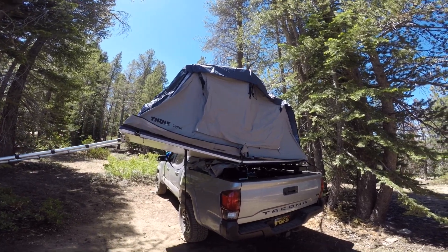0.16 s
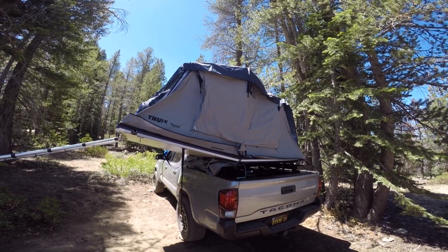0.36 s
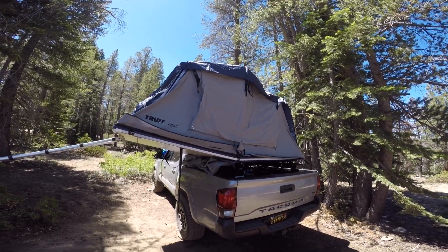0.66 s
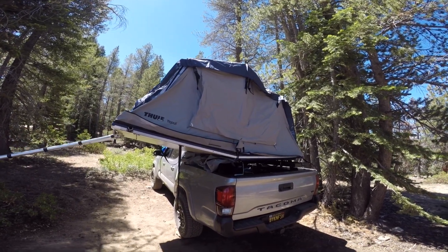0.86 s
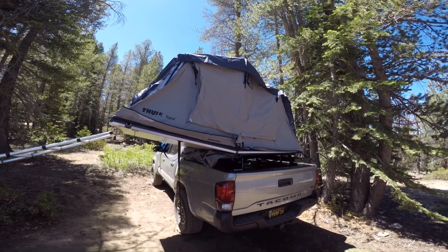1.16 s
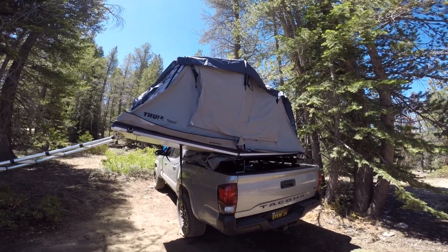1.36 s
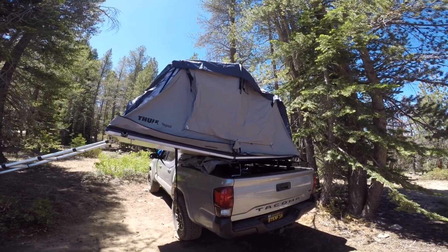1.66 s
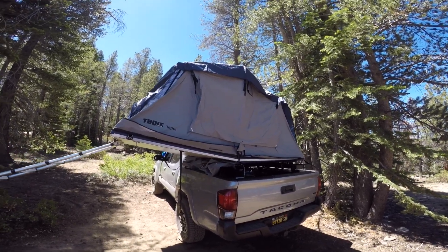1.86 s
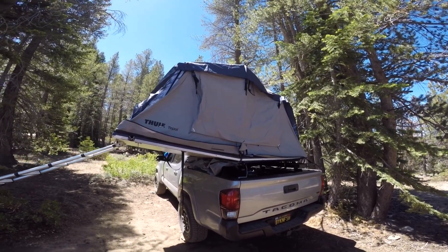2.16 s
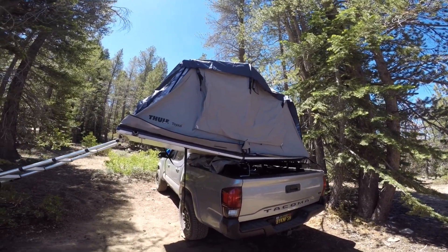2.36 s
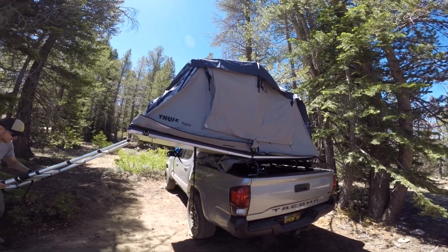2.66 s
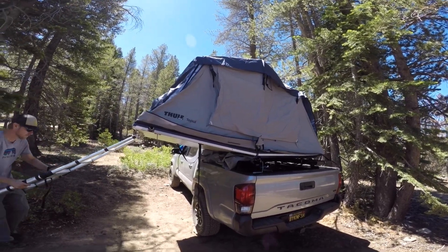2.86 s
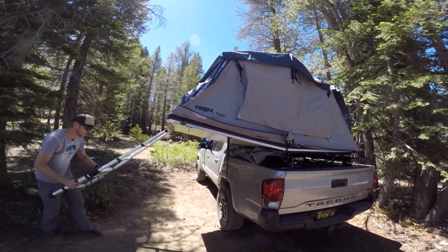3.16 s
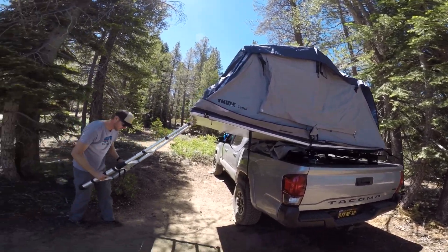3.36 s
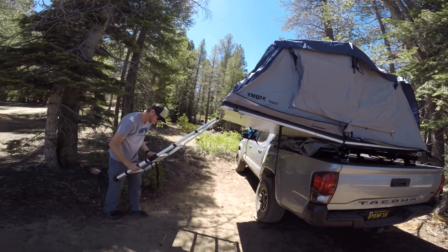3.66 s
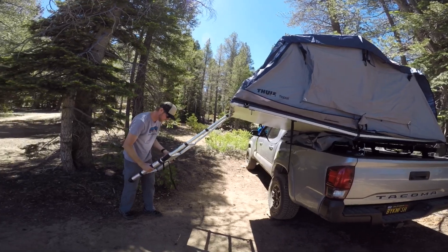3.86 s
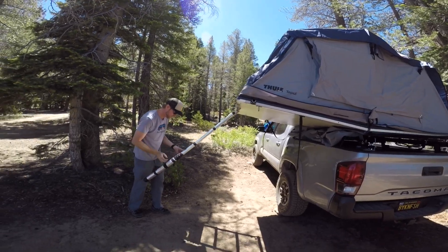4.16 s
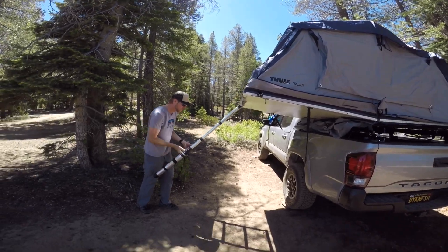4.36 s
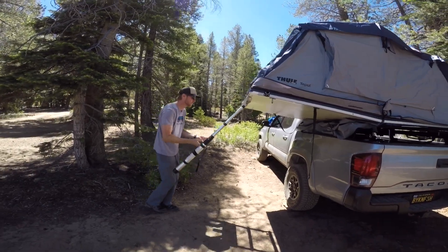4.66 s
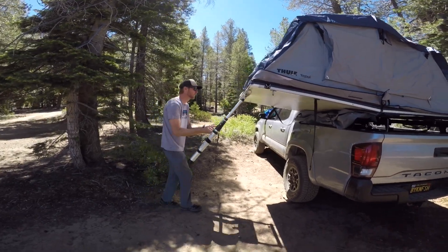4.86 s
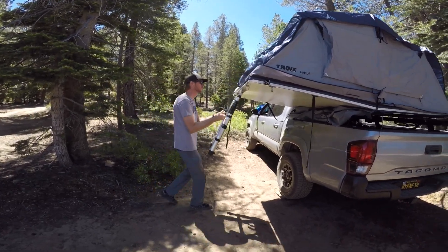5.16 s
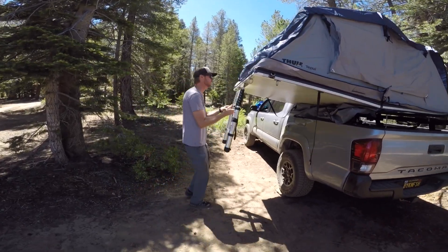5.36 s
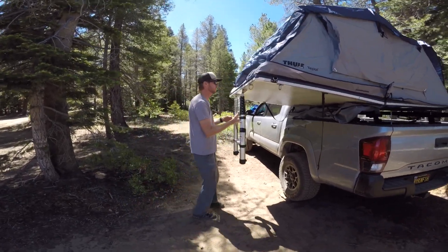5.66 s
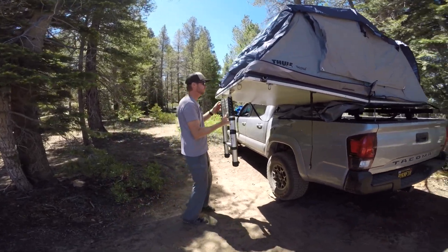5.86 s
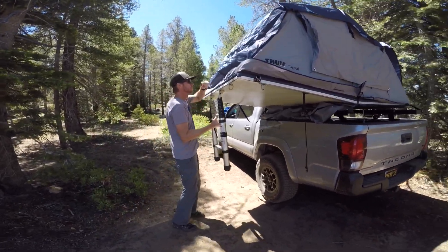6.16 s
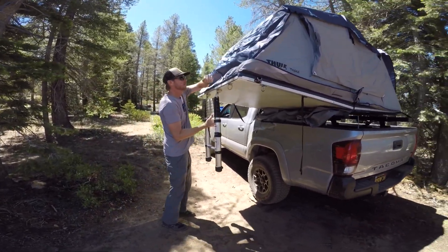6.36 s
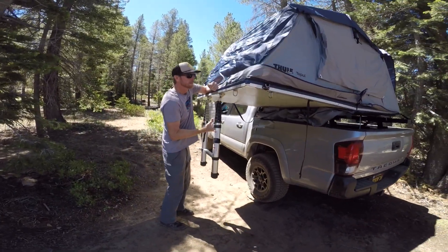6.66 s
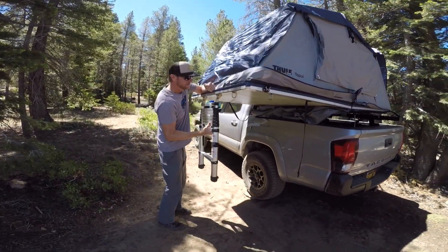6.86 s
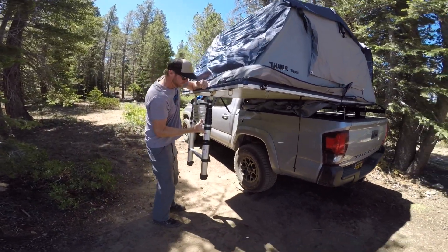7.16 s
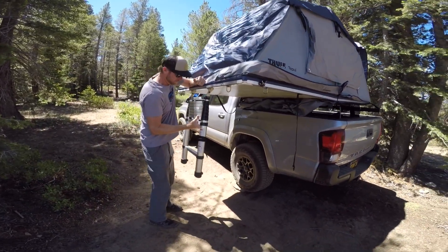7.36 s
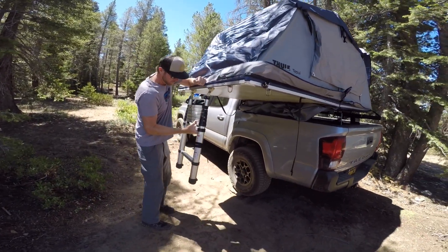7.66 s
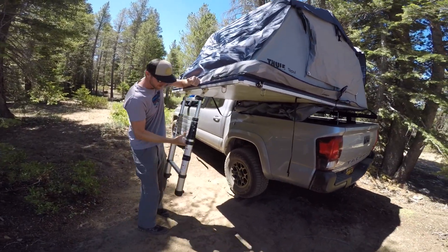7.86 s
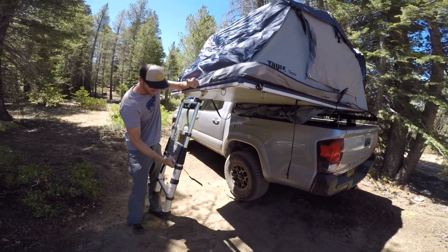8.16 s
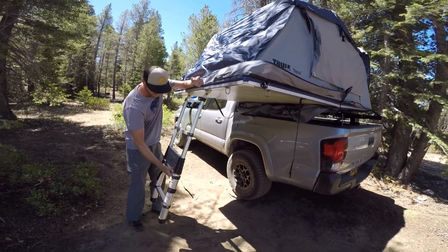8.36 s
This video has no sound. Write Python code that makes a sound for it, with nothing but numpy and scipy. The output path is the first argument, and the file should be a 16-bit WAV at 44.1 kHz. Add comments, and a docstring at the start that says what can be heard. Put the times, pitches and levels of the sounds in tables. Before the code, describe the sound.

Outdoors, close and dry with slight scatter from truck and ground: light latch clicks, then stronger aluminium knocks with short rings, and deep boxy handling bumps. Later come dry canvas scuffs, gritty ticks and a faint singing slide of tubes, then a final sharp clack. Low gusts buffet the microphone above a far, smooth hiss of trees.

```python
"""Beside an opened rooftop tent in a quiet forest, a telescopic aluminium ladder is pushed together and swung down.
Noise cracks with decaying modes make its latches and tubes clack; singing band noise makes the tubes slide.
Shaped noise makes grit tick and canvas rustle; swelling damped tones thump the frame and the camera housing.
Gusting low noise flutters on the microphone ports, over the steady far hiss of the pines."""
import sys
import numpy as np
from scipy import signal
from scipy.fft import rfft, irfft
from scipy.io import wavfile
from scipy.ndimage import uniform_filter1d, map_coordinates

SR = 44100
rng = np.random.default_rng(int(sys.argv[2]) if len(sys.argv) > 2 else 0)


def store_wav(level_fs):
    """Save 16-bit WAV to argv[1]."""
    pcm = np.round(np.clip(np.atleast_2d(level_fs), -1, 1) * 32767)
    wavfile.write(sys.argv[1], SR, pcm.T.astype(np.int16))


N = 375732
TIME = np.arange(N) / SR
RING = TIME[:int(SR * .25)]  # time within one contact, s
OPPOSITE = np.array([[1], [-1]])  # signs of a side signal in left and right

# width of spread sounds at the two ports, side minus mid: hz, gain_db
DIFFUSE_WIDTH = [(60, -6), (200, -2.5), (380, -1), (700, 8), (1300, 5), (2400, -1), (4400, -6), (8000, 0.5),
                 (15000, 0.5)]
# spectrum of bright sliding friction: hz, gain_db
SLIDE_COLOUR = [(900, -6), (2200, 7), (3300, 7), (4800, 2), (6400, 5), (8000, 0), (15000, -54)]
# single strokes of cloth and strap: start_s, length_s, soft_brushing_db, bright_sliding_db
STROKES = [(0.829, 0.16, -52.5, -56.5), (3.224, 0.13, -64, -53.5), (3.916, 0.23, -76, -57.5),
           (4.202, 0.15, -53.5, -72), (4.904, 0.32, -60.5, -61), (5.459, 0.23, -48, -59.5),
           (6.44, 0.19, -50.5, -59), (6.596, 0.21, -45.5, -64), (7.035, 0.08, -48, -46.5),
           (7.146, 0.064, -52, -45), (7.499, 0.088, -43.5, -58), (7.683, 0.48, -52.5, -65),
           (8.123, 0.15, -49, -52.5)]
# restlessness of the grip on the camera: time_s, level_db of the housing's murmur before its trim
GRIP = [(0.0, -49.5), (0.88, -45.5), (1.44, -56), (1.73, -36.5), (2.52, -47.5), (2.8, -36.5), (3.06, -47.5),
        (4.03, -44), (4.86, -52), (5.2, -36), (6.29, -63.5), (6.45, -36.5), (6.67, -31.5), (6.87, -48.5),
        (7.31, -44), (7.66, -47), (8.52, -66)]


def undb(db):
    """Decibels to amplitude ratio."""
    return 10 ** (np.asarray(db) / 20)


def unit(x):
    """Normalisation to rms 1."""
    return x / np.sqrt(np.mean(x ** 2))


def curve(rows):
    """Linear interpolation of (time, value) rows over the scene."""
    times, values = np.transpose(rows)
    return np.interp(TIME, times, values)


def colour(x, points):
    """Minimum-phase filter through (Hz, dB) points, from the folded cepstrum of the log gain."""
    size = 8192
    hz, db = np.transpose(points)
    bin_hz = np.arange(size // 2 + 1) * SR / size
    gain_db = np.interp(np.log(bin_hz + 1), np.log(hz), db)
    cepstrum = irfft(np.log(undb(gain_db)))
    cepstrum[1:size // 2] *= 2
    cepstrum[size // 2 + 1:] = 0
    impulse = irfft(np.exp(rfft(cepstrum)))
    return signal.fftconvolve(x, impulse)[:len(x)]


def band(x, lo_hz, hi_hz):
    """Butterworth band-pass."""
    return signal.sosfilt(signal.butter(2, [lo_hz, hi_hz], "band", fs=SR, output="sos"), x)


def stereo(mid, side, width):
    """Mid-side decoding: left and right are the sum and difference of mid and coloured side."""
    side = colour(side, width)
    return np.array([mid + side, mid - side])


def panned(x, rows):
    """Intensity panning along a curve of left minus right dB."""
    return x * undb(OPPOSITE * curve(rows) / 2)


def walk(rate_hz):
    """Slow random modulation of rms 1: random steps smoothed by two moving averages."""
    hold = int(SR / rate_hz)
    steps = rng.standard_normal(4096)[np.arange(N) // hold]
    return unit(uniform_filter1d(uniform_filter1d(steps, hold), hold))


def add(track, s, sound):
    """Linear superposition of a sound at time s."""
    i = max(int(s * SR), 0)
    track[..., i:i + sound.shape[-1]] += sound[..., :N - i]


def fade(t60):
    """Exponential decay of a damped body, 60 dB in t60 seconds."""
    return np.exp(-np.log(1000) * RING / t60)


def grains(points, spread_db):
    """Stick-slip friction as coloured noise of rms 1, its tiny slips very unequal in size."""
    slip = 32  # samples
    size = undb(spread_db * np.minimum(rng.exponential(size=N // slip + 1), 6))
    return unit(colour(rng.standard_normal(N) * size[np.arange(N) // slip], points))


def strike(mid, side, db, body_db, edge_db):
    """Contact mechanics: hardness tilts the spectrum, force sets the mid band's rms over the first 5 ms."""
    # width of a contact, side minus mid: hz, gain_db
    direct_width = [(200, -26), (700, -1), (1200, -2.5), (2200, -4), (4000, -18), (7000, 0), (12000, 2)]
    tilt = [(900, body_db), (2000, 0.0059), (4200, 0.0045),
            (6500, edge_db), (9000, edge_db), (15000, edge_db - 30)]
    mid, side = colour(mid, tilt), colour(side, tilt)
    first = band(mid, 1800, 5000)[:SR // 200]
    return undb(db) * stereo(mid, side, direct_width) / np.sqrt(np.mean(first ** 2))


def ladder():
    """Impact excitation of modes: each contact touches, bites and bounces; its latch pings, its tube rings on."""
    # modes of the ladder tubes: pitch_hz, level_db, t60_s
    tube_modes = [(1866, -25, .07), (2223, -0.5, .11), (2407, 0.5, 0.063), (2655, -7, 0.057),
                  (3010, -3, 0.046), (3230, 7, 0.039), (3510, 3, 0.041), (4350, 4, 0.043),
                  (4580, -4.5, 0.11), (5130, -15, 0.093), (5880, -2.5, 0.043), (6235, -1.5, 0.048),
                  (7000, -4, 0.083)]
    # spectrum of latch cracking on tube: hz, gain_db
    crack_colour = [(250, -6.5), (500, 3), (900, 6), (1500, 5), (2200, 2), (3500, 5), (5000, 0.5),
                    (7000, -4), (9000, -13.5), (11000, -6.5), (15000, -57)]
    # latches click and tubes clack home: time_s, level_db, dull_body_db, bright_edge_db (all before the trims),
    # latch_ring_hz, latch_ring_db, tube_ring_hz, tube_ring_db (ring peaks relative to level_db)
    clacks = [(0.96, -38, 3, 4, 3450, 1, 2217, -1), (1.7157, -40, -6, -7, 3850, 8, 3300, -13),
              (1.724, -34.5, 1, -3.5, 3530, -1, 2300, -5), (1.745, -30, -0.5, -0.5, 2720, -3, 2130, -3.5),
              (2.2442, -27, -11, -1.5, 3740, 7.5, 2375, -6), (2.262, -30.5, 4.5, -0.5, 2420, -7, 2200, -5),
              (2.753, -24.5, -11, -2.5, 2570, -3, 3590, -18), (2.771, -31, 1.5, 3.5, 4860, 0, 2190, -15),
              (4.5622, -19, -2, -1.5, 3610, 1, 3210, -13), (4.577, -24, -15, -1, 2970, -5, 4180, -12),
              (4.583, -24, 1, -4, 1890, 2.5, 2250, -15), (4.8804, -16.5, -35, -4, 3400, 4.5, 3095, -6),
              (4.896, -18.5, -7, -1, 4260, 4, 2285, -7), (4.907, -31.5, -10, -2, 4470, 7, 4220, -4),
              (5.236, -19, 0.5, 2, 4030, -1, 2120, -9), (5.265, -30, 5, -5, 7770, 1, 3235, -7),
              (5.7333, -31.5, 5.5, 0, 3090, -3, 2180, -14), (7.271, -38.5, -27, 5, 3480, 4, 2286, -17),
              (7.287, -42, -31, 1, 4150, 9, 3480, -16), (8.239, -33.5, 3, 2, 4690, 5, 5470, -1),
              (8.265, -15, 0, 1, 2230, 0, 6200, -5), (8.272, -19, -8, -1.5, 3450, 4.5, 3110, -6)]
    level_trim_db, body_trim_db, edge_trim_db = -2, 2, 4
    crack_t60, wall_t60, latch_t60, tube_t60, touch_t60 = .05, .041, .042, .1, .0058  # s
    chatter_db, wall_db, ring_db, ring_side_db, touch_db = 5, -1, -9, -10, -12
    waver_hz = 60  # bandwidth of a ring
    bounce_s, bounce_db = .003, -4  # mean flight, and loss at each of two bounces

    hz, mode_db, mode_t60 = np.transpose(tube_modes)[:, :, None]
    tubes = undb(mode_db) * fade(mode_t60) * np.exp(2j * np.pi * hz * RING)
    # the thin tube walls add a crowd of short modes
    wall_hz = np.exp(rng.uniform(np.log(1750), np.log(10000), size=(70, 1)))
    walls = np.exp(2j * np.pi * wall_hz * RING) * fade(wall_t60)

    def mix(modes):
        """Modal superposition with random amplitudes and phases."""
        weights = rng.standard_normal(len(modes)) + 1j * rng.standard_normal(len(modes))
        return np.einsum("m,mt->t", weights, modes).real / np.sqrt(len(modes))

    def blow():
        """Broadband impact: chattering noise and wall modes crack, tube modes ring."""
        steps = np.clip(rng.standard_normal(len(RING)), -2, 2)
        chatter = undb(chatter_db * steps)[np.arange(len(RING)) // 64]
        crack = rng.standard_normal(len(RING)) * chatter * fade(crack_t60)
        cracking = colour(crack / 2 + undb(wall_db) * mix(walls) / 2, crack_colour)
        return cracking + undb(ring_db) * mix(tubes)

    def ping(ring_hz, db, ring_t60):
        """Phase diffusion: loose parts keep rubbing, so the pitch wavers and the ring is a narrow band."""
        waver = np.cumsum(rng.standard_normal(len(RING))) * np.sqrt(2 * np.pi * waver_hz / SR)
        phase = 2 * np.pi * (ring_hz * RING + rng.random()) + waver
        both = np.sin(phase) + undb(ring_side_db) * OPPOSITE * np.cos(phase)
        return undb(db) * fade(ring_t60) * both

    out = np.zeros((2, N))
    for s, db, body, edge, latch_hz, latch_db, tube_hz, tube_db in clacks:
        clack, bounce, settle = (
            strike(blow(), blow(), db + level_trim_db, body + body_trim_db, edge + edge_trim_db)
            for _ in range(3))
        add(out, s - .002, undb(touch_db) * clack * fade(touch_t60))  # light touch before the bite
        latch_ring = ping(latch_hz, db + latch_db, latch_t60)
        tube_ring = ping(tube_hz, db + tube_db, tube_t60)
        add(out, s, clack + latch_ring + tube_ring)
        flight = bounce_s * (.5 + rng.random())
        add(out, s + flight, undb(bounce_db) * bounce)
        add(out, s + 2 * flight, undb(2 * bounce_db) * settle)
    return out


def sliding():
    """Friction-driven resonance: a tube hisses and sings inside the next, its pitch drifting with the push."""
    # tubes run in or out: start_s, length_s, level_db
    slides = [(4.742, 0.16, -55), (7.142, 0.49, -59), (7.676, 0.57, -58)]
    # resonances of a sliding tube: centre_hz, width_hz, gain_db
    hollows = [(2200, 200, -3.5), (3290, 340, -2.5), (4440, 650, -5), (6200, 250, -5.5)]
    grain_db, judder_db, hiss_db = 3, 4, -3
    drift = .03  # rms fraction of pitch

    force = np.zeros(N)
    for s, length, db in slides:
        add(force, s, undb(db) * np.sin(np.linspace(0, np.pi, int(length * SR))))
    warp = np.cumsum(1 + drift * walk(4))  # uneven reading position, samples

    def sing():
        """Formant filtering of friction noise."""
        friction = grains(SLIDE_COLOUR, grain_db)
        hollow = sum(undb(db) * band(friction, hz - width / 2, hz + width / 2) for hz, width, db in hollows)
        drifting = unit(map_coordinates(hollow, [warp], mode="mirror"))
        return unit(drifting + undb(hiss_db) * friction)

    return force * undb(judder_db * walk(25)) * stereo(sing(), sing(), DIFFUSE_WIDTH)


def snaps():
    """Chance events in time slots: creases and grit snap within each stroke; rows like those of the ticks."""
    slots_per_s, above_db, spread_db = 32, 3.5, 2.5  # level above the bright sliding, plus or minus the spread
    body_db, edge_db = 3, -3  # before the trims of the ticks
    chance = rng.random((len(STROKES), 24, 2))
    rows = []
    for (s, length, soft_db, bright_db), draws in zip(STROKES, chance):
        for k, (when, force) in enumerate(draws):
            after = (k + when) / slots_per_s
            if after < length:
                arch_db = 20 * np.log10(np.sin(np.pi * after / length) + 1e-3)
                db = bright_db + arch_db + above_db + spread_db * (2 * force - 1)
                rows.append((s + after, db, body_db, edge_db))
    return rows


def ticks():
    """Heavily damped impacts: crisp dry noise snaps with a short crumbling tail and no ring."""
    # grit, buckles and canvas: time_s, level_db, dull_body_db, bright_edge_db (all before the trims)
    tick_rows = [(0.1135, -52, -3, 5), (0.2512, -51, 5, 1), (0.884, -48.5, 12, 0), (0.9039, -44.5, 10, -13),
                 (1.4798, -48, -24, 1.5), (1.5412, -50, 12.5, -1), (1.775, -41, -3, 4),
                 (2.025, -50.5, 12, 1), (2.3851, -46.5, 12, -7), (3.235, -46.5, 12.5, -21),
                 (4.0765, -46, 15, 2), (4.218, -52, -4, 14), (4.7195, -43, -4, 2.5), (6.495, -46, 8.5, 2.5),
                 (6.519, -48, 3.5, -5), (6.55, -47.5, 11, 3), (6.6, -49, 13, -3), (6.621, -47, 10, 1),
                 (6.634, -50, 14, -4), (6.64, -45, 10, 0), (6.656, -43, 12, -6), (7.106, -44, 5, 4),
                 (7.406, -49.5, -24, 6)]
    # spectrum of a tick: hz, gain_db
    tick_colour = [(200, 4), (450, 11.5), (900, 12), (2000, 16), (4700, 9), (6500, 13), (10000, -7),
                   (15000, -52)]
    level_trim_db, body_trim_db, edge_trim_db = 1, 1, 1
    snap_t60, tail_t60, tail_db = .0038, .053, -7  # s, s, dB
    envelope = fade(snap_t60) + undb(tail_db) * fade(tail_t60)
    out = np.zeros((2, N))
    for s, db, body, edge in list(tick_rows) + snaps():
        mid, side = (colour(rng.standard_normal(len(RING)) * envelope, tick_colour) for _ in range(2))
        add(out, s, strike(mid, side, db + level_trim_db, body + body_trim_db, edge + edge_trim_db))
    return out


def bumps():
    """Chance events in time slots: fingers bump as hard as the grip is restless; rows like those of the thumps."""
    slots_per_s, above_db, top_db, spread_db = 7, 11, -28, 6.5  # above the grip up to a top, then spread
    centre_hz, rise_s, knock_db, side_db = 187.7, .0089, -30, -13
    chance = rng.random((200, 3))
    grip_db = curve(GRIP)
    rows = []
    for k, (when, force, pitch) in enumerate(chance):
        s = (k + when) / slots_per_s
        if s < TIME[-1]:
            db = min(grip_db[int(s * SR)] + above_db, top_db) + spread_db * (2 * force - 1)
            hz = centre_hz * (1 + .25 * (pitch - .5))
            rows.append((s, db, hz, rise_s, knock_db, side_db))
    return rows


def thumps():
    """Damped low mode: soft pushes swell it and rebound, with a boxy knock of the panels and a faint after-ring."""
    # frame and camera housing: time_s, push_peak_db (before the high-pass), pitch_hz, rise_s (3 ms at least),
    # boxy_knock_db (relative to the peak), side_minus_mid_db
    thump_rows = [(1.372, -25.5, 180.6, .011, -17, -5), (1.558, -22.5, 167.5, 0.013, -19, 5),
                  (1.646, -29.5, 420, 0.0033, -8, -8), (1.666, -22, 254, 0.0023, -15.5, -12),
                  (1.732, -19.5, 188.6, 0.015, -6, -28), (1.777, -18, 193, 0.0088, -22, -29),
                  (1.899, -21.5, 170.5, 0.012, -36, -4), (2.046, -16.5, 183, 0.0095, -13, -31),
                  (2.258, -17.5, 196, 0.006, -10, -30), (2.387, -15.5, 191, 0.0043, -17.5, -30),
                  (2.634, -24, 204, 0.01, -19, -15), (2.678, -27.5, 207, 0.015, -13, -15),
                  (2.761, -10, 182.6, 0.0075, -16.5, -40), (2.878, -22, 220, 0.0063, -10.5, -27),
                  (2.945, -24.5, 194, 0.0065, -13, -18), (3.143, -26.5, 197, 0.0067, -17, -17),
                  (3.237, -21.5, 193, 0.0075, -11.5, -25), (3.723, -21, 170.5, 0.011, -29, 0),
                  (3.788, -21, 185, 0.0085, -22, 4), (3.814, -23.5, 170, 0.013, -23, 4),
                  (3.859, -24.5, 190, 0.006, -35, 5), (3.947, -15.5, 181.5, 0.0073, -30, -32),
                  (4.061, -25.5, 179, 0.0081, -23, 2), (4.109, -23.5, 188, 0.0085, -35, -24),
                  (4.563, -11, 177.7, 0.012, -10.5, 6.5), (4.567, -17, 549, 0.0024, -12, 5),
                  (4.585, -18, 201.4, 0.013, -40, 5), (4.817, -25, 201, 0.01, -21, -15),
                  (4.886, -18.5, 190.7, 0.013, -12, -33), (5.116, -25.5, 198.7, 0.015, -16, -7),
                  (5.19, -28, 196.6, 0.011, -26, -11.5), (5.238, 0, 200.4, 0.007, -12.5, -33),
                  (5.252, -3.5, 220, 0.0067, -30, -12), (5.282, -15.5, 179, 0.014, -28, -8),
                  (5.737, -1.3, 193, 0.0068, -26, -35), (6.429, -28, 217, 0.0064, -12, -20),
                  (6.568, -19.5, 217, 0.0062, -10.5, -26), (6.641, -22, 201, 0.0084, -13, -22),
                  (6.676, -16.5, 193, 0.0043, -16, -28), (7.041, -11, 177, .007, -17, -32),
                  (7.051, -11, 207, 0.0061, -15, -34), (7.082, -11.5, 199, 0.0074, -21, -31),
                  (7.117, -20, 175.7, 0.009, -19, -27), (7.14, -14, 181, 0.0046, -15.5, -32),
                  (7.16, -22, 174, 0.013, -25, -25), (7.708, -27.5, 187.2, 0.012, -13, -13),
                  (8.26, -7.5, 168, 0.012, -17, -39)]
    # spectrum of the boxy knock: hz, gain_db
    knock_colour = [(150, -41), (270, 12), (340, 12.5), (420, 2), (520, -4.5), (700, -14.5), (1200, -49)]
    knock_t60, knock_side_db = .11, -9  # s, dB
    after_hz, after_db, after_t60 = 176, -25, .29  # Hz, dB, s
    rebound_s, rebound_db = .0279, -14.5  # the frame springs back once

    def swelling(u):
        """Critically damped rise and fall, cubed, peaking at 1 when u is 1."""
        return (u * np.exp(1 - u)) ** 3

    out = np.zeros((2, N))
    for s, db, hz, rise, hard_db, side_db in list(thump_rows) + bumps():
        rise = max(rise, .003)
        u = RING / rise
        late = np.maximum(RING - rebound_s, 0) / rise
        swell = swelling(u) + undb(rebound_db) * swelling(late)
        # a twisting push moves the two ports out of step
        phase = 2 * np.pi * hz * RING
        push = swell * (np.sin(phase) + undb(side_db) * OPPOSITE * np.cos(phase))
        after = undb(after_db) * fade(after_t60) * np.sin(2 * np.pi * (after_hz * RING + rng.random()))
        mid, side = (2 * unit(colour(rng.standard_normal(len(RING)), knock_colour)) * fade(knock_t60)
                     for _ in range(2))
        knock_side = (undb(knock_side_db) + undb(side_db)) * OPPOSITE * side
        knock = undb(hard_db) * (mid + knock_side)
        onset = 1 - np.exp(-u ** 2)
        add(out, s, undb(db) * (push + onset * (after + knock)))
    # the small housing passes little below its own resonance
    return signal.sosfilt(signal.butter(8, 112, "high", fs=SR, output="sos"), out)


def scuffs():
    """Dry friction: taut canvas and shoes catch and drag in a dense scrape that starts at once and runs out."""
    # scuffs of canvas and shoes: start_s, level_db, t60_s
    scuff_rows = [(6.663, -33, 0.14), (6.73, -43, 0.18), (7.04, -34, 0.33), (7.084, -46, .1),
                  (7.143, -26.5, .06), (8.205, -38, 0.28)]
    # spectrum of a scuff: hz, gain_db
    scuff_colour = [(200, -13), (500, 6.5), (1500, 1.5), (3300, -6.5), (4200, -9.5), (6500, -15),
                    (15000, -51)]
    rise_s, grain_db, side_db = .00094, 2, -4
    force = np.zeros(N)
    for s, db, t60 in scuff_rows:
        add(force, s, undb(db) * fade(t60) * (1 - np.exp(-RING / rise_s)))
    mid = grains(scuff_colour, grain_db)
    side = undb(side_db) * grains(scuff_colour, grain_db)
    return force * stereo(mid, side, DIFFUSE_WIDTH)


def rustle():
    """Fibre friction: cloth brushes and straps slide, single strokes swelling out of a steady rustle."""
    # spectrum of soft brushing: hz, gain_db
    brush_colour = [(200, -25.5), (350, 14), (500, 1.5), (750, 0.5), (1300, 1), (2000, -3), (3500, -17.5),
                    (8000, -59)]
    brush_db, slide_db, grain_db, flutter_db = -57, -61, 2.5, 2

    def rub(points):
        """Friction noise, independent in mid and side."""
        return stereo(grains(points, grain_db), grains(points, grain_db), DIFFUSE_WIDTH)

    force = np.zeros((2, N))  # soft, bright
    for s, length, soft_db, bright_db in STROKES:
        arch = np.sin(np.linspace(0, np.pi, int(length * SR)))
        add(force, s, np.outer(undb([soft_db, bright_db]), arch))
    strokes = force[0] * rub(brush_colour) + force[1] * rub(SLIDE_COLOUR)
    steady = undb(brush_db) * rub(brush_colour) + undb(slide_db) * rub(SLIDE_COLOUR)
    return undb(flutter_db * walk(50)) * (strokes + steady)


def grip():
    """Structure-borne noise: fingers shift on the camera and keep its housing murmuring."""
    # spectrum of the housing: hz, gain_db
    housing_colour = [(60, -24), (105, -62.5), (135, 0.5), (170, 1.5), (215, -9.5), (270, -5), (320, -14.5),
                      (400, -24), (600, -48.5), (7000, -42), (13000, -75)]
    trim_db, flutter_db = -3, 5.5
    gain = undb(curve(GRIP) + trim_db + flutter_db * walk(30))
    mid, side = (unit(colour(rng.standard_normal(N), housing_colour)) for _ in range(2))
    return gain * stereo(mid, side, DIFFUSE_WIDTH)


def wind():
    """Turbulent pressure: eddies buffet the ports; gusts rise quickly, hold and die back into the breeze."""
    # gusts: full_strength_s, level_db (before the trim), hold_s, fall_db_per_s
    gusts = [(1.748, -47, .05, 16), (2.754, -58, 0.1, 12), (5.273, -34, 0.54, 23), (6.443, -35, .03, 31),
             (7.06, -26.5, 0.012, 128)]
    # light air between gusts: time_s, level_db (before the trim)
    breeze = [(0, -86), (1.5, -65), (4.5, -74), (7.5, -52), (8.5, -63)]
    # spectrum of wind on the ports: hz, gain_db
    wind_colour = [(12, -4.5), (25, 7), (45, -0.5), (70, -1), (110, -11.5), (200, -12.5), (500, -76)]
    rise_s, trim_db, flutter_db = .053, -2, 2.5
    force = undb(curve(breeze))
    for s, db, hold, fall in gusts:
        rise = np.clip(1 + (TIME - s) / rise_s, 0, 1)
        falling_db = db - fall * np.maximum(TIME - s - hold, 0)
        force = np.maximum(force, rise * undb(falling_db))
    gain = force * undb(trim_db + flutter_db * walk(28))
    mid, side = (unit(colour(rng.standard_normal(N), wind_colour)) for _ in range(2))
    return gain * stereo(mid, side, DIFFUSE_WIDTH)


def surroundings(x):
    """Diffuse reverberation: scatter from truck and ground, with a fainter, shorter wash from the trunks."""
    t = TIME[:SR]
    onset = 1 - np.exp(-(t / .00074) ** 2)
    out = []
    for channel in x:
        echo = 0
        for db, t60 in ((-13, .23), (-27, .082)):  # near scatter, trunks: energy dB, s
            tail = rng.standard_normal(SR) * np.exp(-np.log(1000) * t / t60) * onset
            echo = echo + undb(db) * tail / np.linalg.norm(tail)
        out.append(signal.fftconvolve(channel, echo)[:N])
    return np.array(out)


def forest():
    """Broadband aeolian noise: the smooth far hiss of air in the pines."""
    # spectrum of the forest: hz, gain_db
    forest_colour = [(60, -19.5), (100, -49), (140, 1.5), (175, 4), (260, -9), (500, -15.5), (800, -20),
                     (1500, -28), (3000, -33.5), (4800, -35), (6300, -31.5), (8500, -33), (10500, -35),
                     (15000, -49.5)]
    level_db = -53.5  # rms of the mid signal from 400 Hz to 15 kHz
    mid, side = (colour(rng.standard_normal(N), forest_colour) for _ in range(2))
    sway_db = .3 * walk(1.5)
    gain = undb(level_db + sway_db) / np.std(band(mid, 400, 15000))
    return gain * stereo(mid, side, DIFFUSE_WIDTH)


def scene():
    """Superposition: ladder and ticks move from the left to near the centre as the camera turns; the hand shifts."""
    # place of the ladder and ticks: time_s, left_minus_right_db
    ladder_pan = [(3.2, 4.5), (4.5, -1)]
    # place of the hand on the housing: time_s, left_minus_right_db
    hand_pan = [(3.3, 0), (3.8, -4.5), (4.2, -0.5), (4.5, 3.5)]
    hits = panned(ladder() + ticks(), ladder_pan)
    handling = panned(thumps() + grip(), hand_pan)
    friction = sliding() + scuffs() + rustle()
    return hits + surroundings(hits) + friction + handling + wind() + forest()


def record(dry):
    """Saturation and band limit: peaks clip at full scale, then a steep low-pass cuts the top."""
    top_hz = 15100
    low_pass = signal.ellip(12, .2, 90, top_hz, fs=SR, output="sos")
    return signal.sosfilt(low_pass, np.clip(dry, -1, 1))


dry = scene()
out = record(dry)
store_wav(out)
```